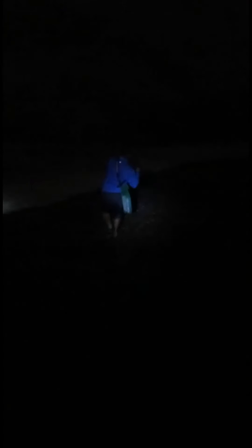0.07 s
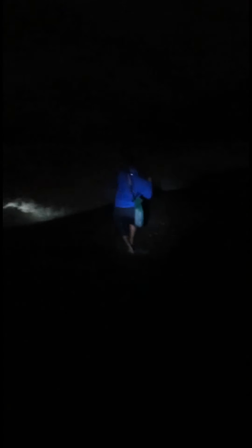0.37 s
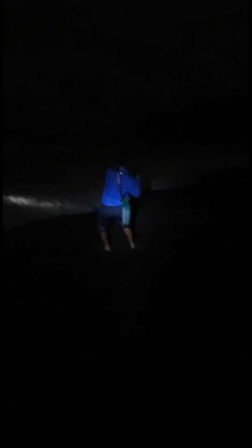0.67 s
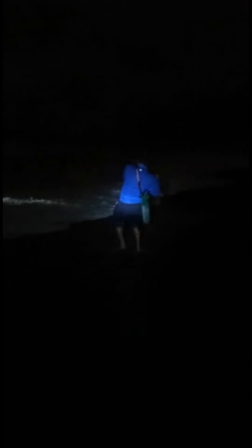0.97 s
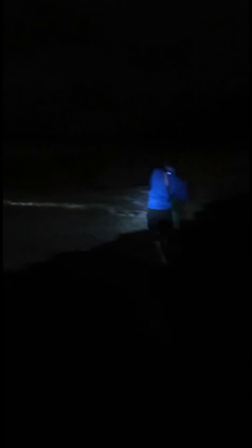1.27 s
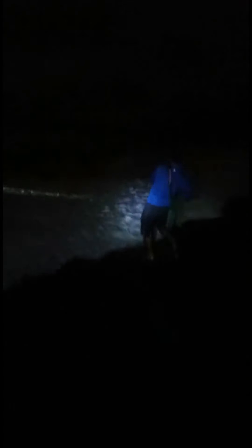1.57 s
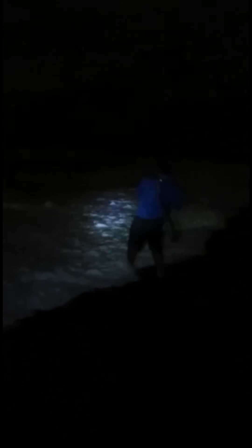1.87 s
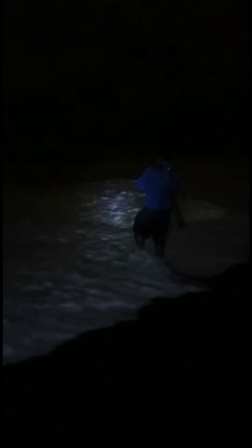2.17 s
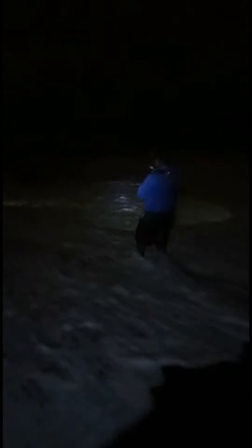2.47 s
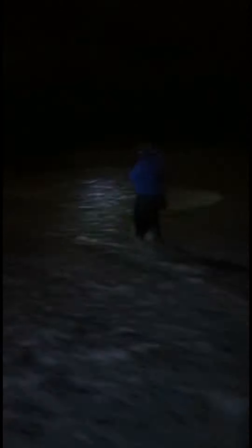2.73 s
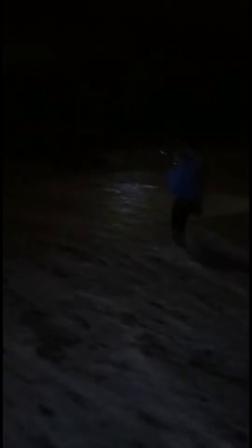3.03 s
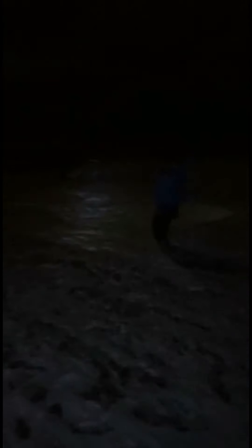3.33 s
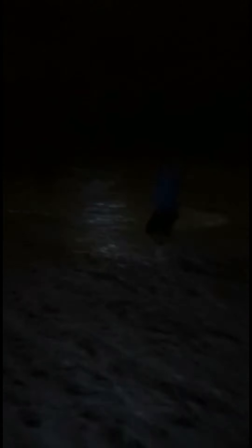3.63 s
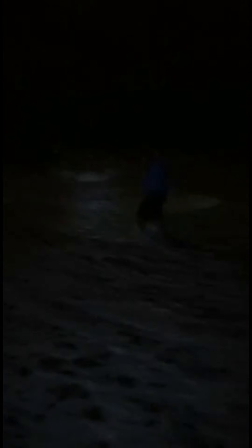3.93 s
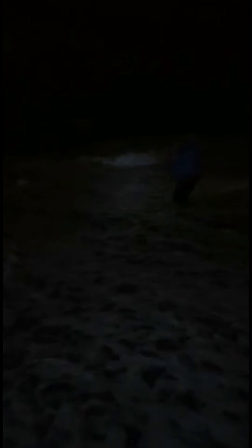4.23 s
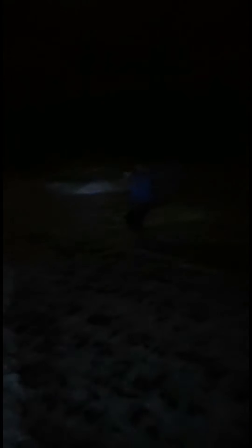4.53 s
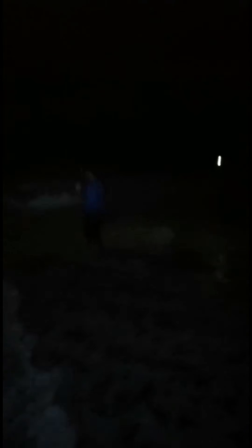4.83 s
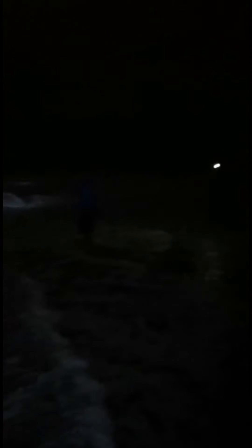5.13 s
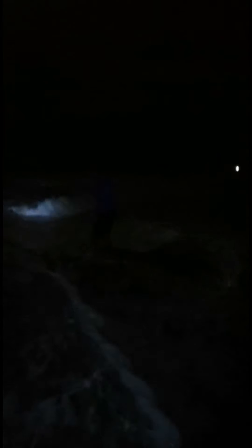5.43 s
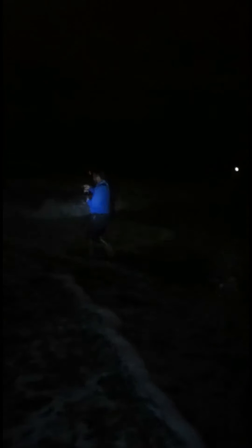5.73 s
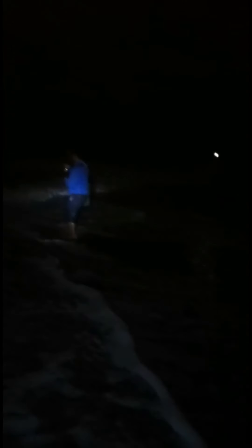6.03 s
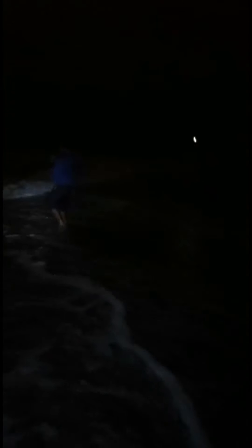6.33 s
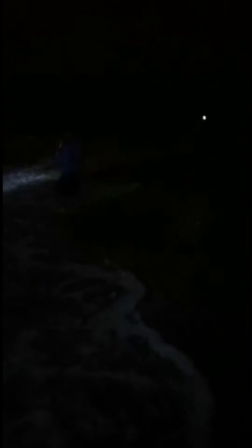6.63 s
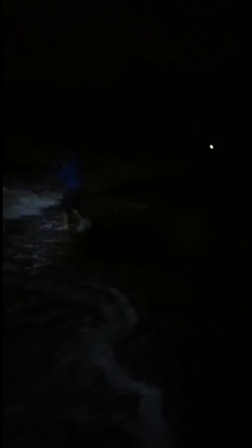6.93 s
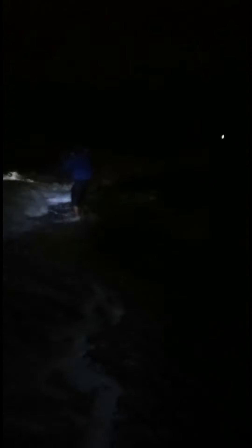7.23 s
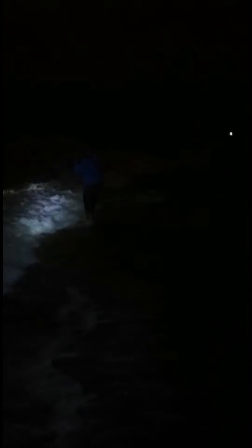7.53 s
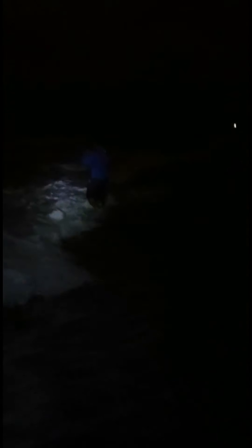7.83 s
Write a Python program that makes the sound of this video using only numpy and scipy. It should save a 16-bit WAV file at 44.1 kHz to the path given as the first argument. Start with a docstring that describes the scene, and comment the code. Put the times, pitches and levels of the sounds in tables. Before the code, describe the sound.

At the water's edge on a beach, a breaker booms and dies away while foam fizzes over the sand. Stray splashes and a few dull bumps follow, then low gulps in the shallows. About halfway through, another wave crashes close by with a sharp slap. A low gust begins buffeting the microphone, and the surf keeps rolling in over a steady distant wash.

```python
"""Night surf on a beach, from the water's edge, through two small microphone ports.
A breaker booms with trapped air and dies away while foam fizzes past over the sand. Stray splashes
follow, a few dull bumps from 2 s on, then air pockets gulping in the shallows. Just after 4 s the
next breaker crashes close by and its lip slaps down. A second later a low gust starts to buffet
the microphone, and the surf rolls in to the end."""
import sys
import numpy as np
from scipy import signal
from scipy.fft import rfft, irfft
from scipy.io import wavfile
from scipy.ndimage import uniform_filter1d, minimum_filter1d

SR = 44100
rng = np.random.default_rng(int(sys.argv[2]) if len(sys.argv) > 2 else 0)


def dump(signal):
    """Clip the signal to [-1, 1] and save it as 16-bit WAV at the path in sys.argv[1]."""
    limited = np.clip(np.atleast_2d(signal).T, -1, 1)
    pcm = np.round(limited * 32767).astype(np.int16)
    wavfile.write(sys.argv[1], SR, pcm)


N = 352800
TIME = np.arange(N) / SR
FREQS = np.fft.rfftfreq(N, 1 / SR)


def gain_of(db):
    """Decibels to amplitude."""
    return 10 ** (np.asarray(db) / 20)


def unit_rms(x):
    """Scales to rms 1."""
    return x / np.sqrt(np.mean(x ** 2) + 1e-20)


def curve(points):
    """Spreads a table over FREQS, interpolating in log frequency."""
    hz, value = np.transpose(points)
    return np.interp(np.log(FREQS + 1), np.log(hz + 1), value)


def placed(db, pan_db):
    """Left and right gains; pan is left minus right."""
    return gain_of(db + np.array([[.5], [-.5]]) * pan_db)


def churn(patch_db, patch_hz, patch_s, flutter_db):
    """Turbulence: two unrelated noises share drifting patches of loudness and a broad flutter."""
    hop, window = 128, 512
    frames = N // hop + 5
    a, b, c, d, patches = rng.standard_normal((5, frames, window // 2 + 1))
    span = max(1, round(patch_s * SR / hop))
    width = max(1, round(patch_hz * window / SR))
    patches = unit_rms(uniform_filter1d(uniform_filter1d(patches, span, axis=0), width, axis=1))
    flutter = unit_rms(uniform_filter1d(rng.standard_normal(frames), span))
    loudness = gain_of(patch_db * patches + flutter_db * flutter[:, None])
    spectra = np.array([a + 1j * b, c + 1j * d]) * loudness
    _, pair = signal.istft(spectra.swapaxes(1, 2), nperseg=window, noverlap=window - hop)
    return unit_rms(pair[:, :N])


def at_ports(pair, spectrum, coherence, lag=0):
    """Colours two unrelated signals and makes them as alike as the ports hear them, at rms 1."""
    left, other = rfft(pair)
    coherence = np.clip(coherence, -1, 1)
    right = (coherence * left + np.sqrt(1 - coherence ** 2) * other) * np.exp(1j * lag)
    return unit_rms(irfft(np.array([left, right]) * gain_of(curve(spectrum)), N))


# Stretches of crest breaking in front of the microphone:
# t/s, relative level/dB, rise/s, nominal run up the beach/s, extra boom/dB, extra churning/dB, pan/dB
CRESTS = [(0.04, 0, 0.19, 1.97, -1, 0, -.5), (1.65, -6, 0.13, 0.32, -16, -2, -3.5),
          (3.65, -12, 0.04, 1.2, -3, -1.5, -1), (4.11, -5, 0.021, 0.52, -3, -0.5, 0),
          (4.365, 0, 0.049, 0.066, 2, 2, -2.5), (4.49, -2.2, 0.051, 0.58, 0.5, -8, -2),
          (5.05, -2, 0.15, 0.47, -15, -5, -1), (5.68, -1.5, 0.65, 1.38, 1.7, 1.5, 0),
          (6.75, -3.5, 0.17, 1.44, -2.5, 2.4, 1.5), (7.62, -7.5, 0.14, 0.8, 4, 4, 3.5)]

def surge(linger, steep, lull_db, boom=0, churning=0, aim=0):
    """One surf layer's gain: each crest swells, breaks and fades over linger x its run; powers add."""
    power = gain_of(lull_db) ** 2
    for start, db, rise, run, boom_db, churning_db, pan_db in CRESTS:
        age = TIME - start
        swell = np.exp(-np.where(age < 0, (age / rise) ** 2, abs(age / (run * linger)) ** steep) / 2)
        peak = placed(db + boom * boom_db + churning * churning_db, aim * pan_db)
        power = power + (peak * swell) ** 2
    return np.sqrt(power)


# The breakers' four layers from the water's edge, deepest first: f/Hz, relative level/dB
RUMBLE_SPECTRUM = [(20, -35), (50, -27.5), (75, 0), (125, 4.5), (170, -2), (260, -2.5), (600, -46),
                   (2000, -83)]
ROAR_SPECTRUM = [(50, -44), (100, -20), (160, -3), (230, -2), (370, -2.5), (520, -8.5), (750, -14.5),
                 (1200, -38), (4000, -70.5)]
TUMBLE_SPECTRUM = [(100, -44), (300, -4.5), (500, -1), (750, 0), (900, -3.5), (1100, -11.5), (2000, -21.5),
                   (6000, -60)]
CRASH_SPECTRUM = [(150, -33), (500, -10.5), (900, 1), (1400, 0.5), (2000, -2.5), (2700, -3.5), (3700, -5),
                  (4600, -9.5), (7000, -9.5), (15000, -28)]
# How far the left port trails the right on the surf: f/Hz, phase/rad
SURF_PHASE = [(50, -0.5), (300, 0.34), (700, 0.83), (1400, 0.97), (2000, 1.02), (2600, 1), (3600, 1.33),
              (4200, 2.5), (5200, 5), (6800, 3), (7800, 1), (15000, 0.5)]
# How alike the ports hear the surf: f/Hz, coherence
SURF_COHERENCE = [(50, 1), (250, 0.99), (700, 1), (1200, 0.71), (2000, 0.9), (3000, 0.28), (3700, 0.096),
                  (4600, 1), (6500, 0.38), (9000, 0.38), (15000, .2)]

def breakers():
    """Clouds of trapped air boom, roar and die first; tumbling water and spray run on up the beach."""
    coherence, lag = curve(SURF_COHERENCE), curve(SURF_PHASE)
    rumble = churn(patch_db=0.8, patch_hz=200, patch_s=0.04, flutter_db=-1)
    rumble = at_ports(rumble, RUMBLE_SPECTRUM, np.interp(FREQS, [60, 140], [.6, .9]))
    rumble *= np.hypot(gain_of(-22.5) * surge(linger=0.38, steep=2.5, lull_db=-6.5, boom=0.96), gulps())

    roar = churn(patch_db=1, patch_hz=200, patch_s=0.066, flutter_db=0.5)
    roar = at_ports(roar, ROAR_SPECTRUM, coherence, lag)
    roar *= gain_of(-15.5) * surge(linger=0.64, steep=3.1, lull_db=-12, boom=0.45)

    tumble = churn(patch_db=1.1, patch_hz=200, patch_s=0.06, flutter_db=1)
    tumble = at_ports(tumble, TUMBLE_SPECTRUM, coherence, lag)
    tumble *= gain_of(-20.5) * surge(linger=1, steep=3.1, lull_db=-13, churning=0.9)

    crash = churn(patch_db=1.12, patch_hz=400, patch_s=0.055, flutter_db=0.04)
    crash = at_ports(crash, CRASH_SPECTRUM, coherence, lag)
    crash *= gain_of(-20) * surge(linger=0.8, steep=4.2, lull_db=-8.5, aim=1)
    return rumble + roar + tumble + crash


# Surf farther off, all along the beach: f/Hz, relative level/dB
SHORE_SPECTRUM = [(50, -27), (120, 3), (210, 3), (400, -1.5), (600, -6), (900, -9.5), (1600, -12),
                  (3000, -28.5), (6000, -36)]
# How alike the ports hear the water all around: f/Hz, coherence
WASH_COHERENCE = [(80, 0.13), (280, 0.97), (600, 0.74), (1000, 0.24), (1900, 0), (3000, 0.013),
                  (15000, 0.006)]

def shore():
    """Many waves blend into a steady wash without direction that fills the lull between breakers."""
    wash = churn(patch_db=-0.1, patch_hz=250, patch_s=0.075, flutter_db=0.5)
    return placed(-25, pan_db=1) * at_ports(wash, SHORE_SPECTRUM, curve(WASH_COHERENCE))


def bubbles(per_s, low_hz, high_hz, cycles, spread_db, sizes=12):
    """Bubbles of many sizes and strengths ring briefly, rising in pitch, each at one port."""
    out = np.zeros((2, N))
    t = np.arange(600) / SR
    per_size = int(per_s * N / SR / sizes)
    for hz in np.geomspace(low_hz, high_hz, sizes):
        when, strength, side = rng.random(size=(4000, 3))[:per_size].T
        pop_db = spread_db * np.minimum(-np.log(1 - strength), 5)
        pops = np.zeros((2, N))
        pops[(side * 2).astype(int), (when * N).astype(int)] = gain_of(pop_db)
        age = hz * t / cycles  # small bubbles ring higher and die sooner
        glide = 1 + 0.015 * np.minimum(age, 4)
        ring = hz ** 0.77 * np.exp(-age) * np.sin(2 * np.pi * hz * t * glide)
        out += signal.oaconvolve(pops, ring[None], axes=1)[:, :N]
    return unit_rms(out)


# The sheet of foam on the sand, close to the microphone: t/s, relative level/dB, pan/dB
FOAM_SHEET = [(0.0, -31, 4), (0.24, -26, 2), (0.99, -28.5, -0.5), (1.25, -27.5, -0.5), (1.7, -27, 1.5),
              (2.05, -27.5, -2), (2.42, -30.5, 0.5), (2.79, -27, 0), (3.6, -28.7, -0.5), (4.49, -26.5, -1),
              (4.69, -28, 0), (5.0, -22, -1), (5.3, -23.5, -3), (5.45, -24.5, 0.5), (6.05, -25, 1),
              (6.65, -26, -1), (7.83, -25, -2.5), (8.0, -24.5, 2)]
# Its fizz at close range: f/Hz, relative level/dB
FIZZ_SPECTRUM = [(100, -25), (400, 5), (1000, 6), (2200, 3), (3400, -2), (4400, 3.5), (7000, 2.5),
                 (12000, -2), (16000, 0)]

def foam():
    """Countless tiny bubbles merge into an even hiss; the nearest ones crackle."""
    hiss = churn(patch_db=1.48, patch_hz=920, patch_s=0.032, flutter_db=0.66)
    crackle = bubbles(per_s=3600, low_hz=1275, high_hz=13520, cycles=4.6, spread_db=2)
    times, db, pan_db = np.transpose(FOAM_SHEET)
    sheet = placed(np.interp(TIME, times, db), np.interp(TIME, times, pan_db))
    fizz = at_ports(hiss + gain_of(-11) * crackle, FIZZ_SPECTRUM, curve(WASH_COHERENCE))
    return gain_of(4.5) * sheet * fizz


# Sloshes and spits to either side of the microphone:
# t/s, level/dB, centre f/Hz, width/octaves, length/s, pan/dB
SPLASH_EVENTS = [(0.756, -25, 1800, 0.88, 0.034, -2), (1.12, -33, 6000, 1.3, 0.064, 16),
                 (1.631, -23.5, 1000, 1.6, .03, 1), (2.6, -23, 280, 0.65, .018, 3),
                 (2.932, -32.5, 6500, 2.1, 0.045, -9), (3.604, -30, 564, 0.53, 0.062, 7),
                 (3.659, -26.5, 2050, 0.69, 0.016, -1), (4.108, -16, 8640, 0.15, 0.0018, -8),
                 (4.123, -24.5, 530, 0.36, 0.077, -6), (4.32, -21.5, 2300, 1.2, 0.035, -3),
                 (4.335, -28, 8500, 1.2, 0.04, -1), (4.37, -19, 600, 1.3, 0.025, -1),
                 (4.48, -21.5, 1200, 1.7, 0.046, 0), (5.3, -26, 7000, 0.79, 0.061, 3),
                 (5.34, -14.5, 280, 0.93, 0.048, -1.5), (5.626, -16.5, 280, 0.54, 0.042, 0),
                 (5.95, -30, 6600, .22, 0.65, -3.5), (6.02, -24.5, 1700, 1.8, 0.11, -2),
                 (6.138, -15.5, 290, 0.75, 0.021, 1), (6.75, -24, 690, 0.51, 0.066, -8),
                 (7.198, -25, 1600, 0.86, 0.11, -2), (7.53, -24, 623, 0.87, 0.1, -5),
                 (7.55, -31, 4400, 0.29, 0.7, -3), (7.79, -25.5, 8400, .3, 0.076, -1),
                 (7.84, -30, 4500, 0.37, 0.022, 0.5)]

def splashes(alike_below_hz=1300):
    """Each splash swells quickly and falls more slowly: spray if high, a slosh if low."""
    hiss = rng.standard_normal((2, N))
    drops = bubbles(per_s=2700, low_hz=885, high_hz=11700, cycles=0.57, spread_db=-1.5, sizes=6)
    left, other = rfft(unit_rms(hiss + drops))
    coherence = np.exp(-(FREQS / alike_below_hz) ** 2)  # both ports hear a low slosh as one
    water = np.array([left, coherence * left + np.sqrt(1 - coherence ** 2) * other])
    out = np.zeros((2, N))
    for when, db, hz, octaves, length, pan_db in SPLASH_EVENTS:
        band = np.exp(-(np.log2((FREQS + 1) / hz) / octaves) ** 2)
        spray = unit_rms(irfft(water * band, N))
        age = (TIME - when) / length
        swell = np.exp(-np.where(age < 0, 2, .8) * age ** 2)
        out += placed(db, pan_db) * spray * swell
    return out


# Dull bumps at the microphone: t/s, peak level/dB, f/Hz, length/s, pan/dB
BUMP_EVENTS = [(2.131, -13, 178, 0.01, -2.5), (2.614, -9, 143, 0.0054, 13), (5.298, -20, 30, 0.031, 0),
               (5.359, -16, 80, 0.028, 1), (5.39, -20, 48, .018, 3), (6.143, -11, 212, 0.011, -1)]

def bumps():
    """Soft low knocks of a few cycles, in step at both ports."""
    out = np.zeros((2, N))
    for when, db, hz, length, pan_db in BUMP_EVENTS:
        age = TIME - when
        out += placed(db, pan_db) * np.exp(-(age / length) ** 2) * np.cos(2 * np.pi * hz * age)
    return out


# Air pockets in the shallows: t/s, level/dB, pan/dB
GULP_EVENTS = [(3.63, -27, -15), (3.77, -24, -18), (3.99, -19, 9), (4.26, -27, -11), (4.48, -30, 4),
               (4.92, -23, 2), (5.15, -20, 0), (5.35, -22, 3), (5.62, -18, 4), (6.48, -18, -1),
               (6.85, -24, 0), (7.64, -23, -11), (7.87, -21.5, -11)]

def gulps(swell_s=0.038):
    """Each air pocket gulps, swelling and sinking: a gain for the breakers' rumble."""
    return sum(placed(db, pan_db) * np.exp(-((TIME - when) / swell_s) ** 2 / 2)
               for when, db, pan_db in GULP_EVENTS)


# Drops off the lip of the near breaker: f/Hz, relative level/dB
SLAP_SPECTRUM = [(300, -23), (800, -4), (1300, 2), (2400, -6), (3600, -2), (5500, -13), (14000, -20)]

def slap(at_s=4.375, spread_s=0.049):
    """The falling lip shatters into a short patter of separate, sharp impacts."""
    drops = bubbles(per_s=420, low_hz=900, high_hz=4200, cycles=1.3, spread_db=2, sizes=6)
    patter = at_ports(drops, SLAP_SPECTRUM, coherence=.6, lag=curve(SURF_PHASE))
    fall = np.exp(-((TIME - at_s) / spread_s) ** 2)
    return placed(-18, pan_db=-2) * fall * patter


def gust(at_s=5.28, rise_s=0.03, hold_s=0.31, gust_db=-25, fade_db_per_s=4, calm_db=-46.5):
    """Eddies push on each port almost separately; out of calm air a gust rises, holds and slackens."""
    eddies = churn(patch_db=1, patch_hz=200, patch_s=0.051, flutter_db=-0.5)
    # Air right on the ports: f/Hz, relative level/dB
    spectrum = [(5, 0), (22, 4.5), (42, 4.5), (60, 4), (100, -15), (300, -38), (1500, -94.5)]
    age = TIME - at_s
    onset = np.clip(age / rise_s, 0, 1)
    strength = gain_of(gust_db - fade_db_per_s * np.maximum(age - hold_s, 0))
    return (gain_of(calm_db) + onset * strength) * at_ports(eddies, spectrum, coherence=0.47)


def scene():
    """Everything that reaches the two ports at the water's edge."""
    return breakers() + slap() + shore() + foam() + splashes() + gust() + bumps()


# Uneven treble with an empty band from 9 to 11.5 kHz: f/Hz, level/dB
LOWER_TREBLE = [(4700, 0), (4830, -6), (6020, -3.5), (6200, 3), (6700, 4.5), (7000, 2), (7620, 7),
                (7780, 1), (8450, 0.5), (8720, -16), (8980, -32.5), (9200, -56.5)]
UPPER_TREBLE = [(11450, -44.5), (11620, -3), (12800, -5), (13020, -1), (15400, -5)]
# How the two ports differ: f/Hz, left minus right level/dB
PORT_BALANCE = [(60, -1), (400, -1.5), (1000, -2), (2300, -7), (3400, -3), (4300, 0.5), (5400, -4.5),
                (6500, -0.5), (7500, 3.5), (8400, -8.5), (12000, -3), (15000, -6)]

def record(dry, ceiling=0.97, cutoff_hz=15560):
    """Colours the treble and balances the two sides; then a quick peak limiter and the band limit."""
    colour = placed(curve(LOWER_TREBLE + UPPER_TREBLE), curve(PORT_BALANCE))
    heard = irfft(rfft(dry) * colour, N)
    headroom = ceiling / np.maximum(abs(heard).max(0), ceiling)
    limiter = uniform_filter1d(minimum_filter1d(headroom, size=129), size=129)
    lowpass = signal.firwin(1023, cutoff_hz, window=("kaiser", 9), fs=SR)
    return signal.oaconvolve(heard * limiter, lowpass[None], "same")


dry = scene()
out = record(dry)
dump(out)
```